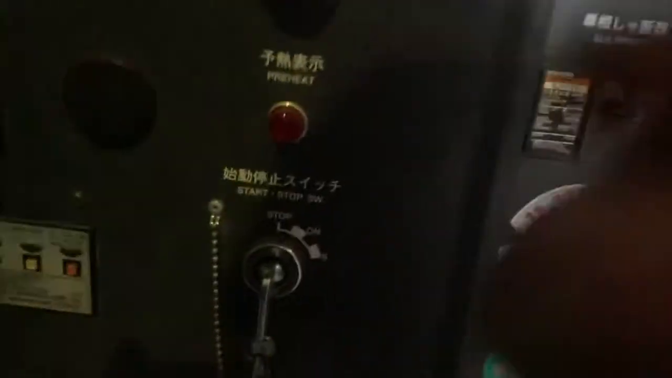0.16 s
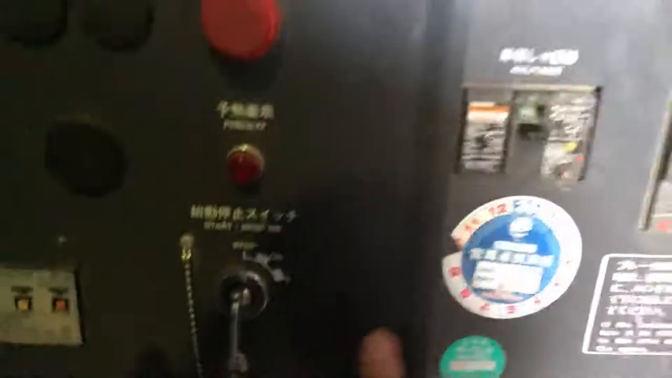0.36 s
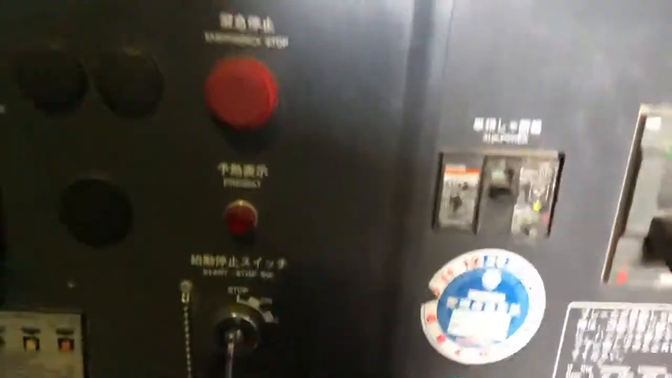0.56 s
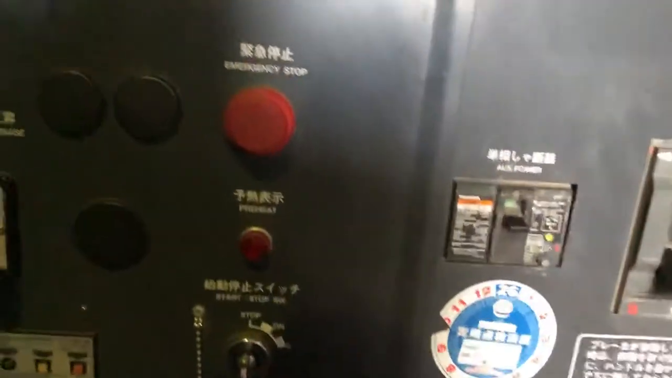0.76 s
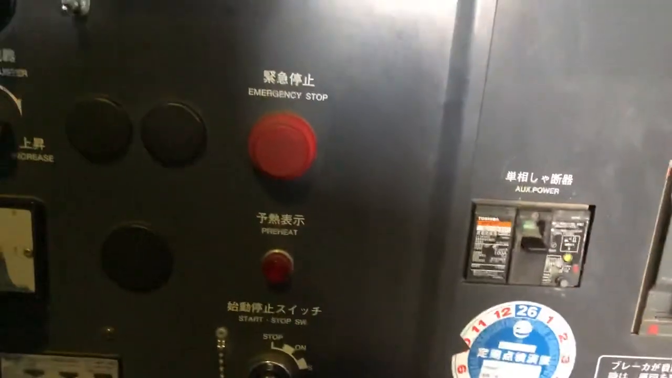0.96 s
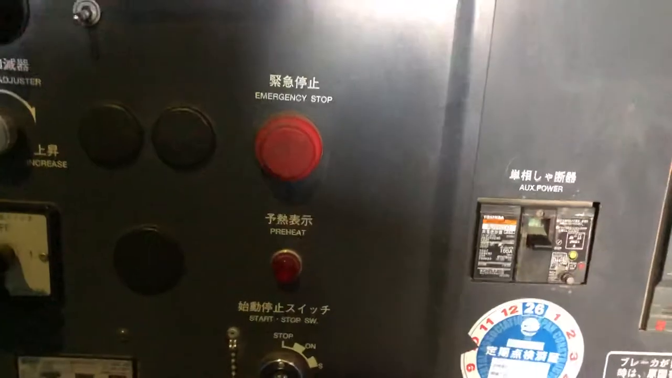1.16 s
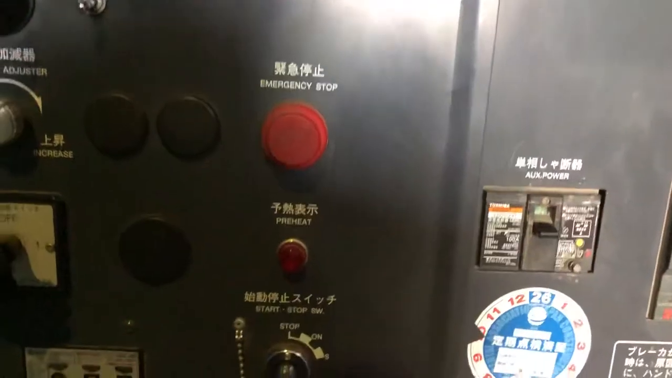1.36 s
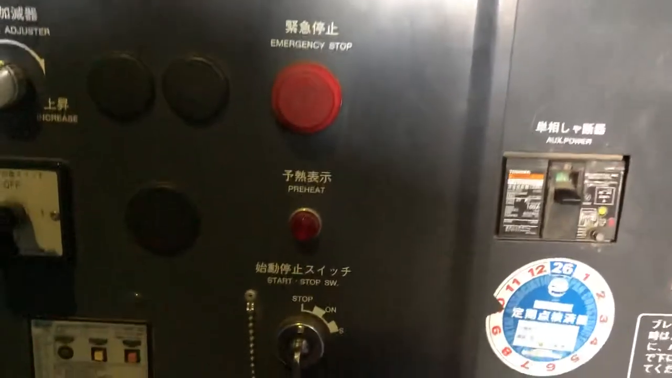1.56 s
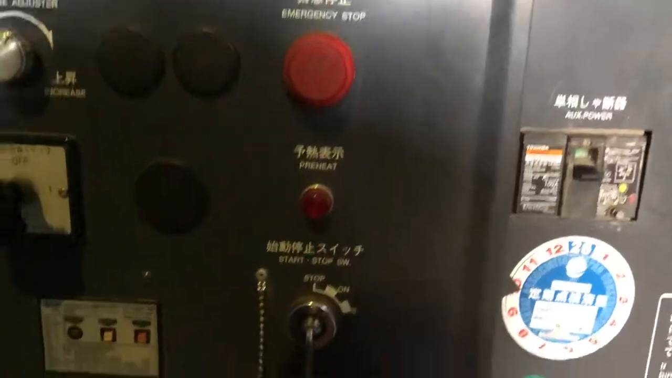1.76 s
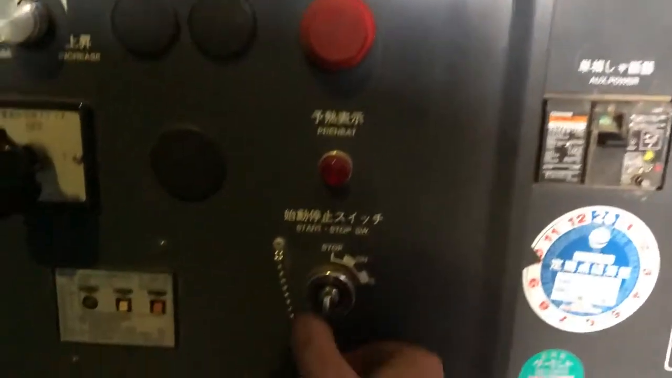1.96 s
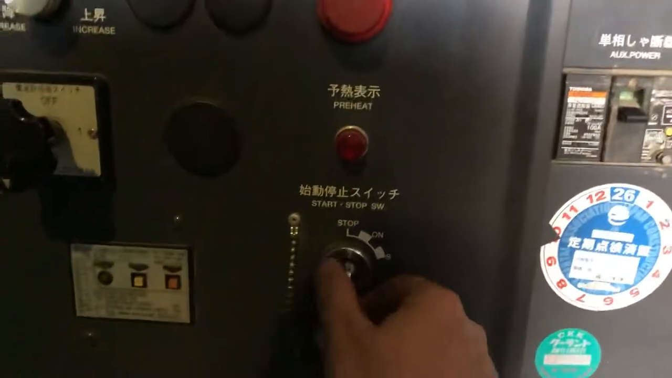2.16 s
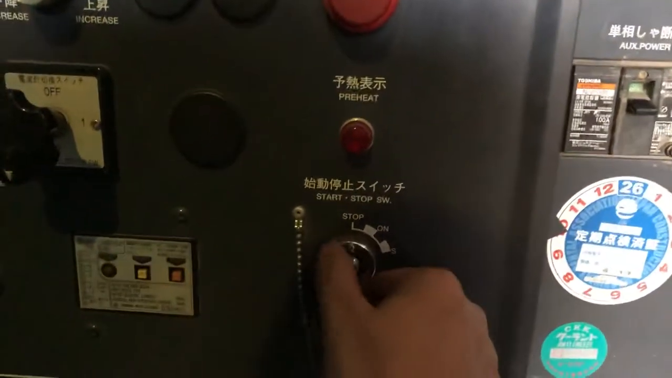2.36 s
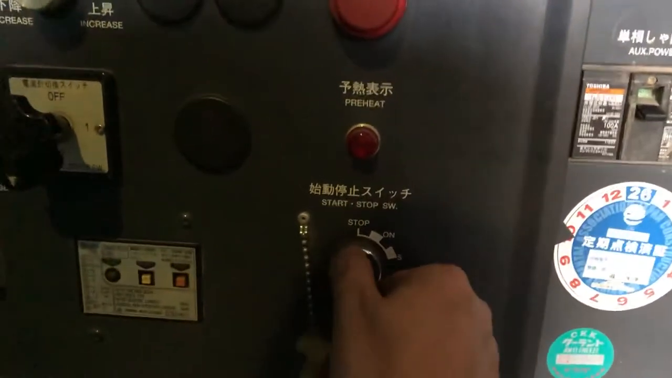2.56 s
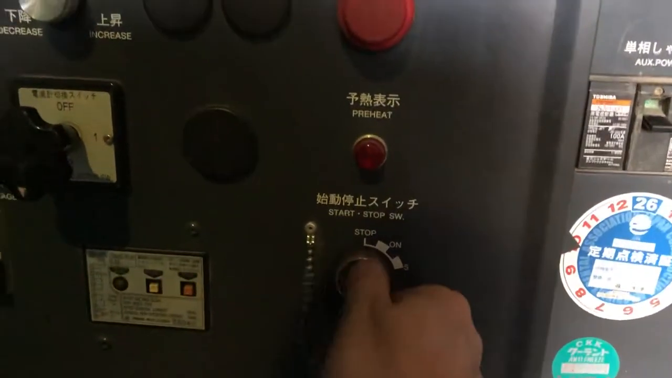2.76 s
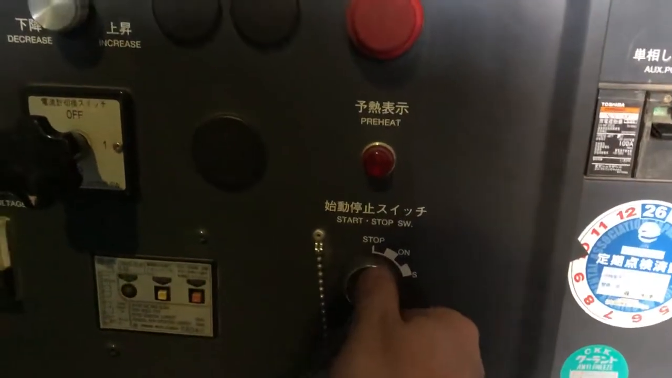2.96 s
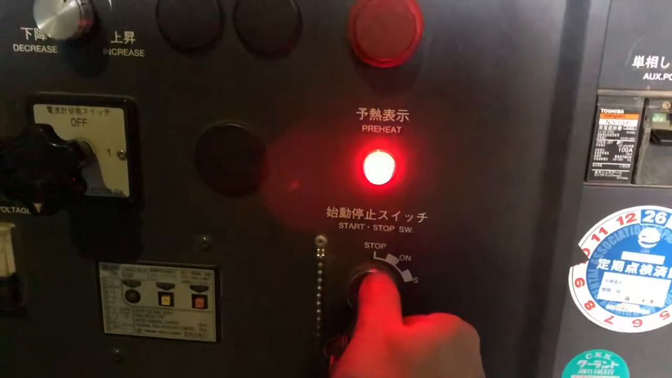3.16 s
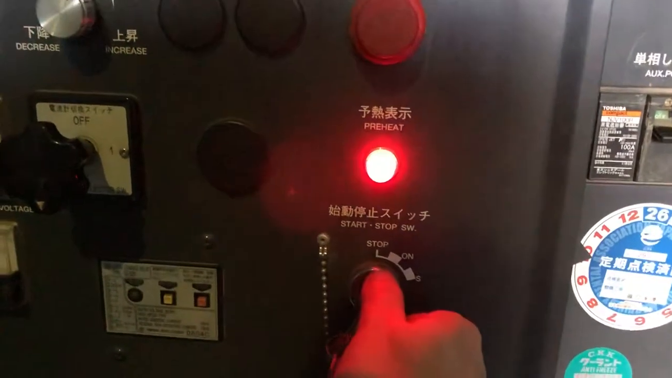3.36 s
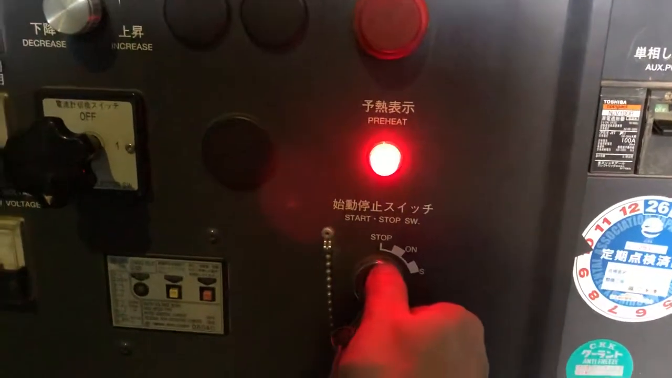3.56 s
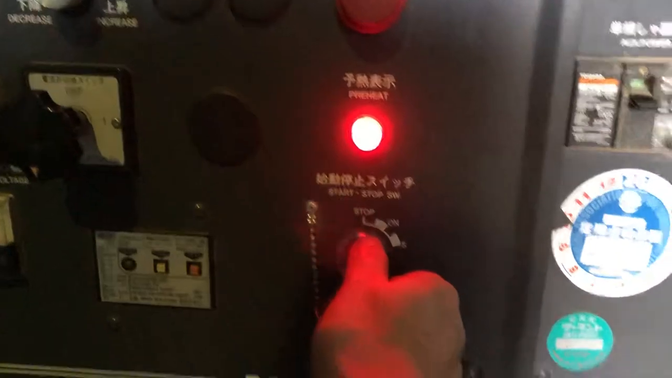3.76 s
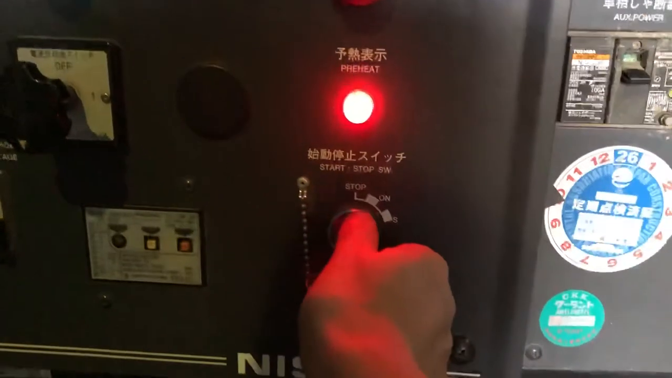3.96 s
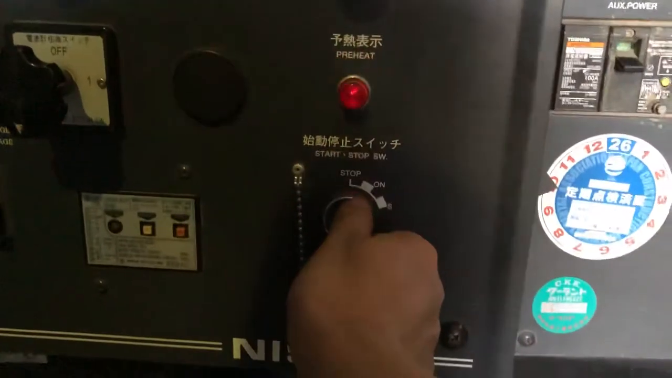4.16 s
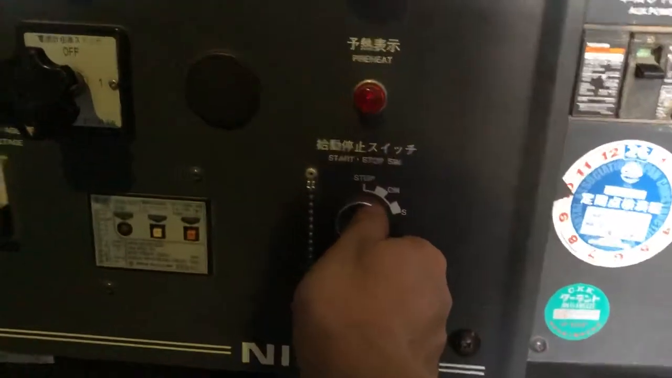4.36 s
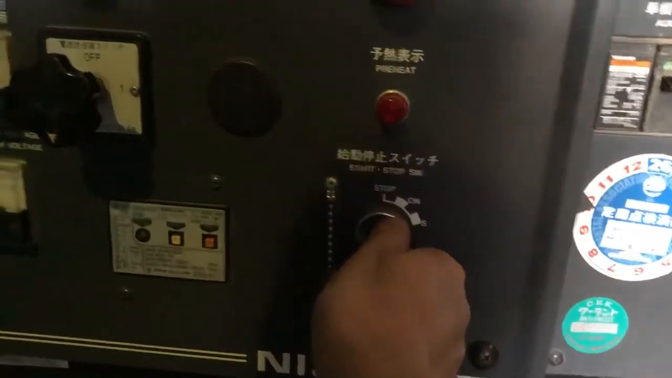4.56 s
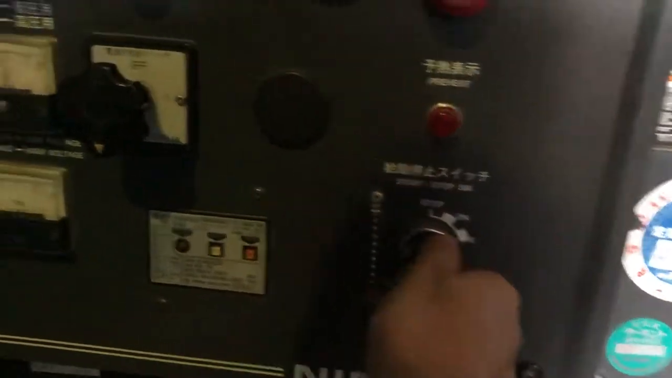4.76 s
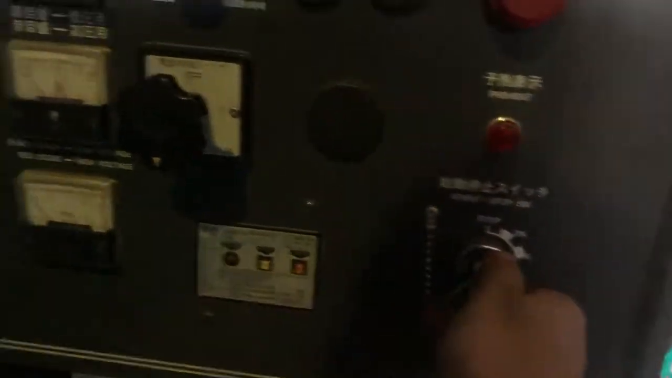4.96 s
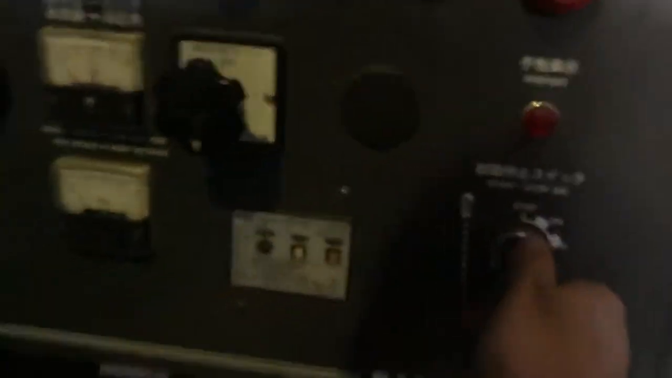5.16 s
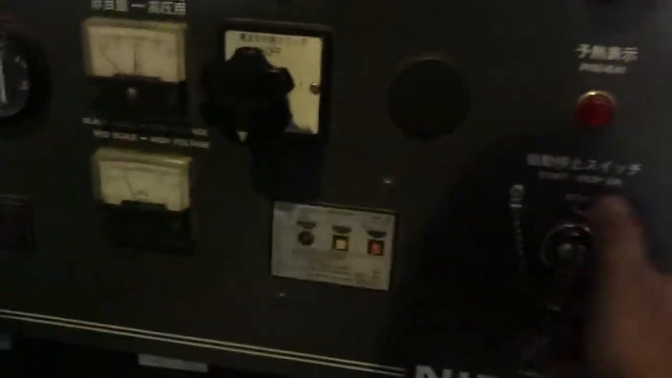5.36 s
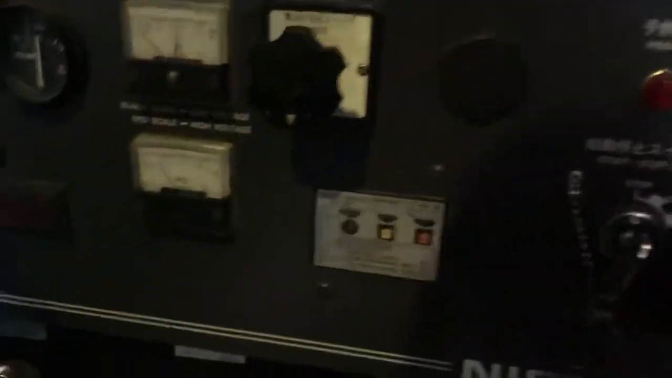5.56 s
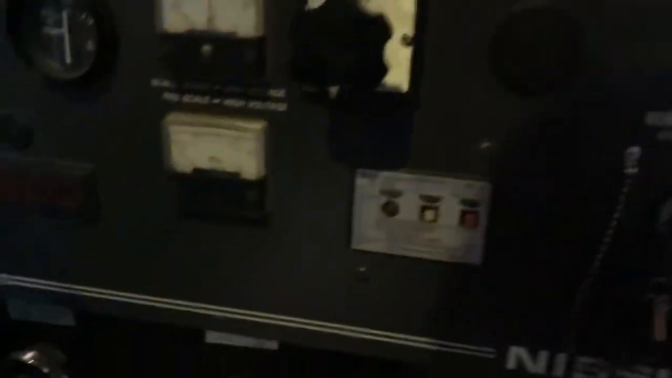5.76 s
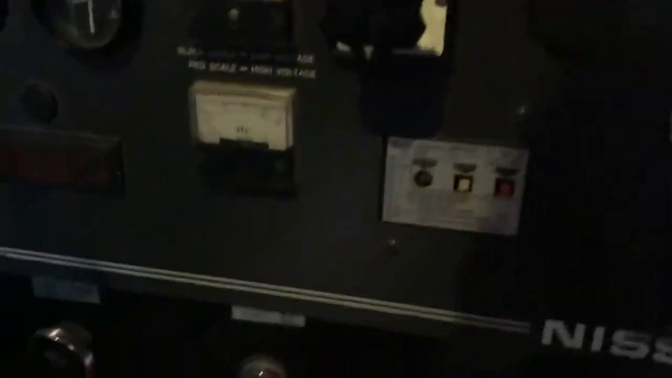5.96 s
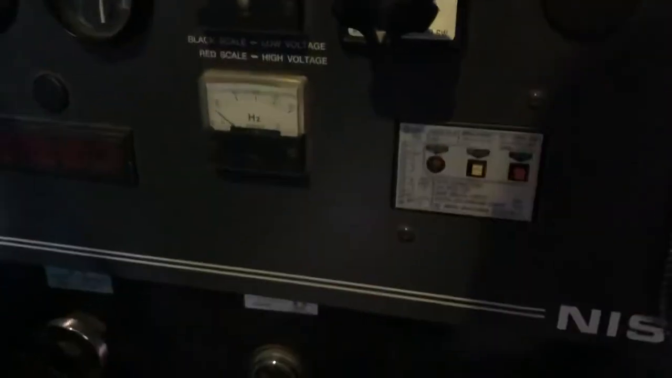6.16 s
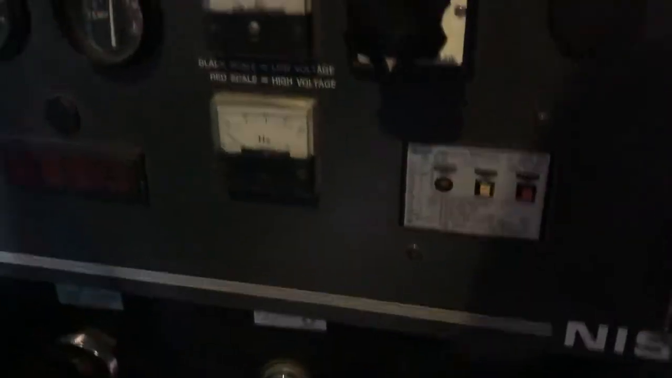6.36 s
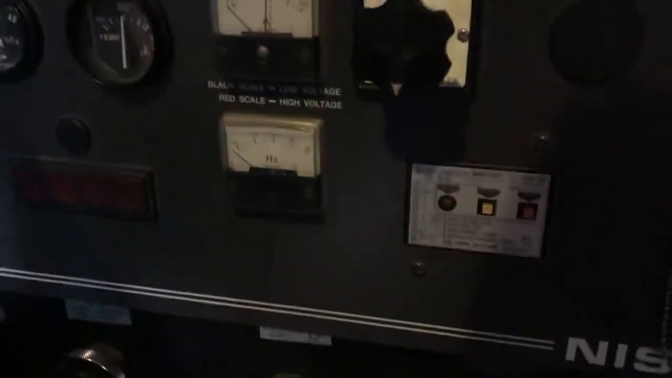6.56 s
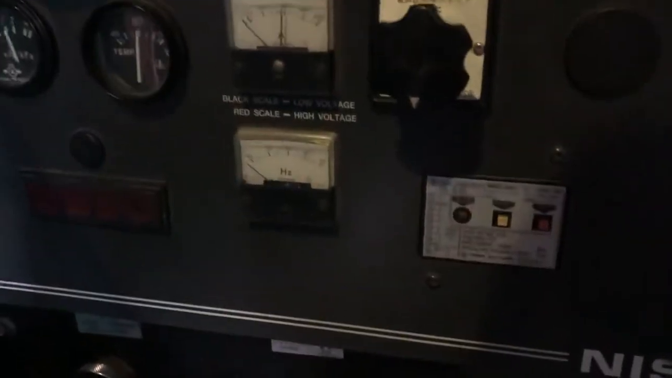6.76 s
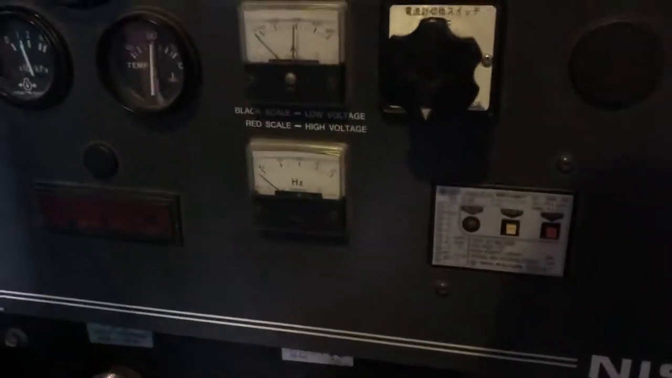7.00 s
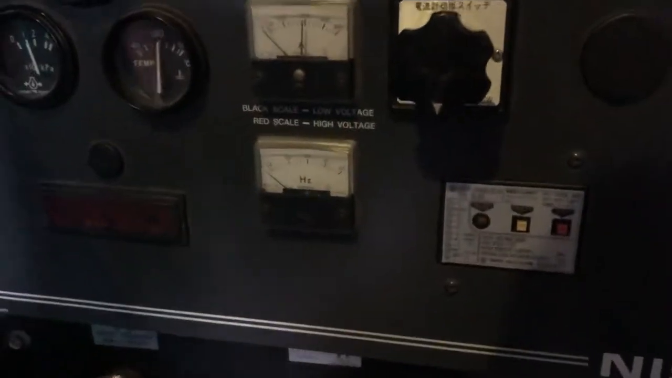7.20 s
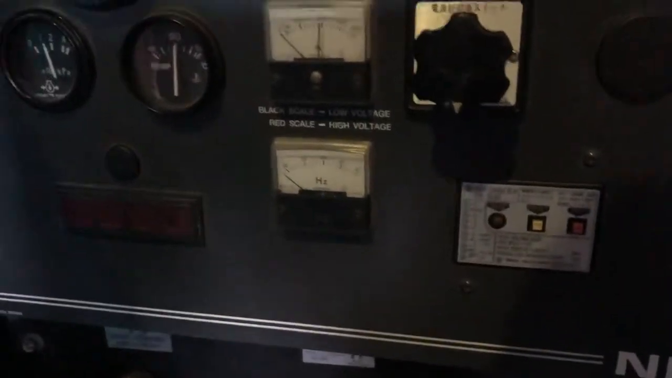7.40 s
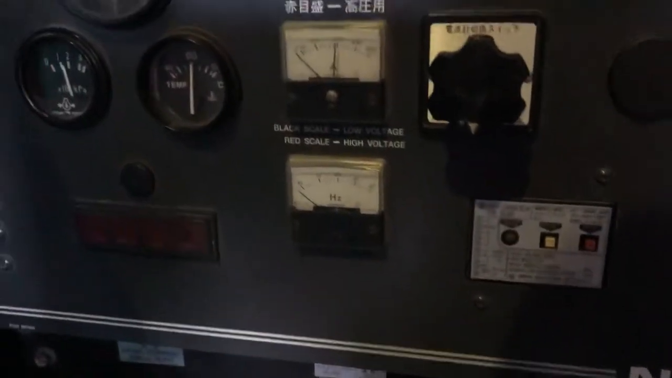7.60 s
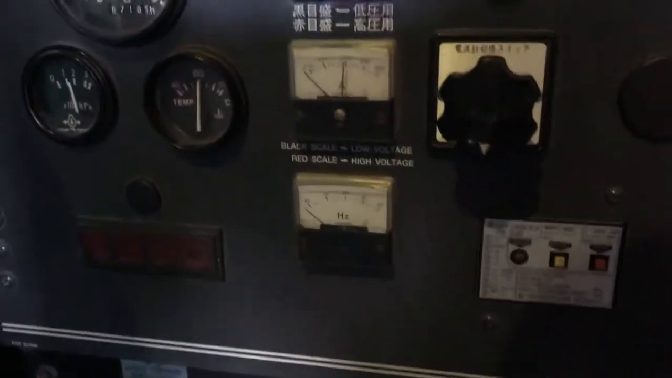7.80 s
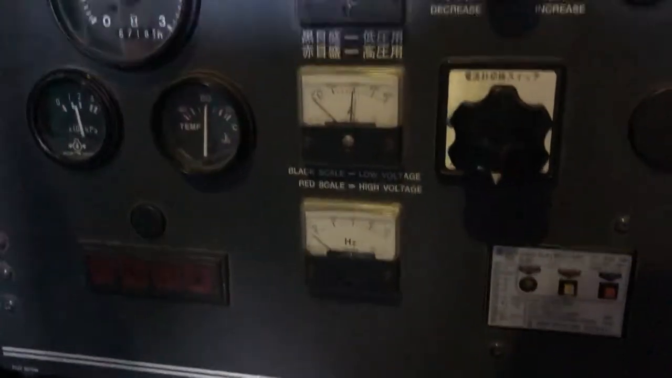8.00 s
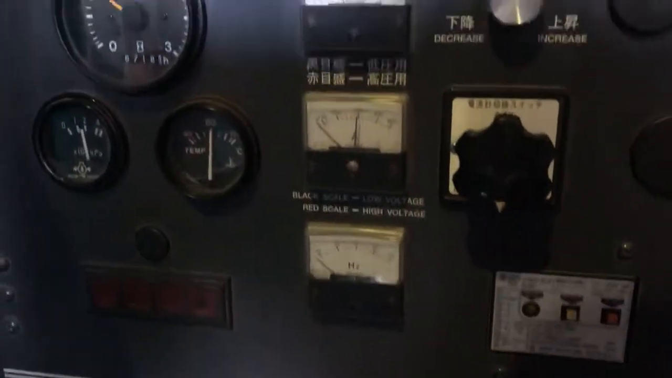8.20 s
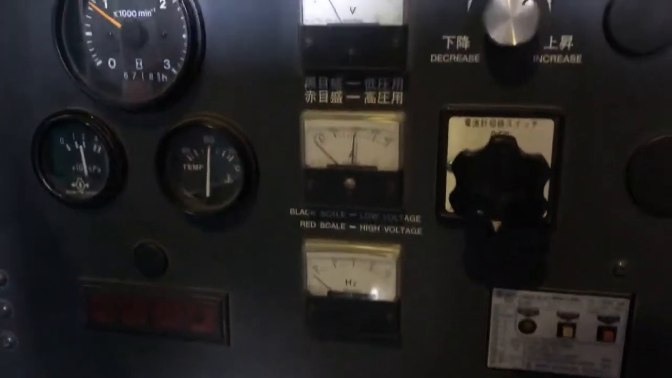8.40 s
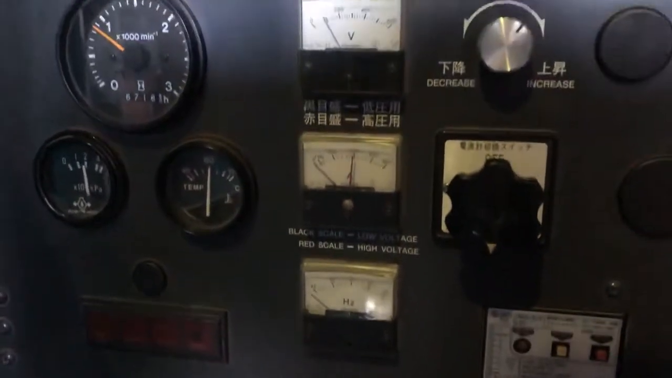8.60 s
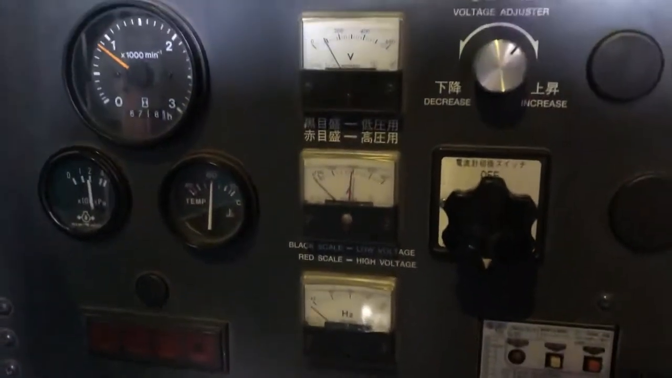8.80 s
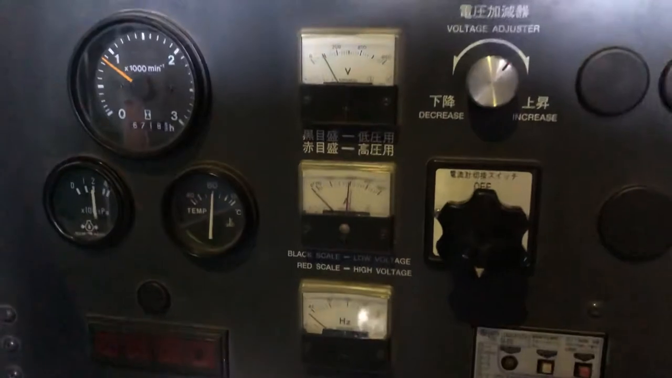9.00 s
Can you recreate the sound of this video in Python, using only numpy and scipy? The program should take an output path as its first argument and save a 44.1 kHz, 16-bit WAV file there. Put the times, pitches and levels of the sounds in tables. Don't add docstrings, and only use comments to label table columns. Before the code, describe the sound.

Quiet indoor hall with a low machinery hum. Small keys tick and jingle on a chain, then a sharp switch snap and relay clacks close by. After a pause, a solenoid clunks, the starter grinds and whines, and a diesel generator heaves, catches, surges briefly and settles to a steady knocking idle with panel drumming and loose metal chatter. Microphone at arm's length, loudest peaks slightly rounded.

```python
import sys
import numpy as np
from scipy import signal
from scipy.fft import rfft, irfft, next_fast_len
from scipy.io import wavfile
from scipy.ndimage import uniform_filter1d

SR = 44100
rng = np.random.default_rng(int(sys.argv[2]) if len(sys.argv) > 2 else 0)


def amplitude_ratio(level_db):
    exponent = np.asarray(level_db, float) / 20
    return 10 ** exponent


def unload_audio(sound):
    columns = np.transpose(np.atleast_2d(sound))
    steps = np.round(np.clip(columns, -1, 1) * 32767)
    wavfile.write(sys.argv[1], SR, steps.astype(np.int16))


N = 398663
T = np.arange(N) / SR

# frequency in Hz, density in dB per Hz.
HALL_SPECTRUM = [(18, -51), (30, -25), (48, -4), (96, -4), (254, -8.5), (322, -11.5), (419, -12),
                 (478, -7.5), (517, -15.5), (899, -16.5), (999, -21), (1610, -18), (2260, -23.5),
                 (7410, -37), (16300, -77)]
# frequency in Hz, width in Hz, lift in dB.
HALL_PEAKS = [(1063, 83, 2), (1870, 38, -13), (2030, 40, -6)]
# frequency in Hz, level in dB.
HUM = [(99.5, -54.5), (447, -64), (472, -64), (597, -66)]

# start in seconds, peak in dB, centre in Hz.
KEYS = [(.0498, -45, 3450), (.0827, -46, 5000), (.1, -41.5, 3140), (.1396, -45, 3710), (.2069, -42, 3550),
        (.3212, -40, 4000), (.6449, -43, 3220), (.7632, -34, 8800), (.8031, -47, 3820), (.8669, -42, 3230),
        (.9792, -45, 3220), (1.2056, -30.5, 6500), (1.397, -46, 4340), (1.5914, -36, 3940),
        (1.609, -29, 3760), (1.6352, -38.5, 6960), (1.785, -36, 10400), (1.863, -29, 3950),
        (1.8941, -43, 7840), (1.9315, -43, 10400), (1.9706, -36, 5210), (2.0093, -37, 8500),
        (2.0334, -33, 13000), (2.1296, -36.5, 12800), (2.1565, -45, 6070), (2.2667, -45, 5260),
        (2.402, -35, 6500), (2.575, -45, 8460), (2.593, -49, 3275), (2.6484, -42, 10430)]
# frequency in Hz, level in dB against the tick.
CHAIN = [(6050, -22), (8450, -22), (10300, -20), (15450, -18)]
# start in seconds, peak in dB, frequency in Hz.
JINGLES = [(.45, -68, 8400), (1.784, -35, 10350), (1.784, -52, 15500), (1.79, -57, 13700),
           (1.894, -52, 7850), (1.894, -50, 10900), (1.931, -55, 10350), (1.971, -59, 10350),
           (2.009, -59, 8500), (2.034, -51, 12900), (2.16, -56, 10350), (2.19, -59, 8600),
           (2.267, -51, 10440), (2.575, -59, 8450), (2.648, -47, 10350), (2.648, -54, 7800),
           (2.805, -40, 15400), (2.835, -52, 15600), (2.2, -60, 14200), (2.3, -63, 10350),
           (3.28, -52, 10300)]
# start in seconds, peak in dB, frequency in Hz, T60 in seconds.
RINGS = [(2.762, -20, 4900, .03), (2.73, -44, 10300, .2), (2.719, -27, 15500, .08),
         (2.719, -22, 5970, 0.02), (2.76, -21, 9200, .035), (2.76, -24, 14300, .04),
         (2.766, -27, 11100, .035), (2.798, -26, 7600, .035), (2.83, -38, 1380, 0.1),
         (2.862, -42, 1440, .14), (2.824, -39, 3350, .12), (4.372, -28, 4620, .06), (4.378, -30, 2300, .05),
         (4.416, -15, 5900, .03), (2.98, -59, 10250, .1), (2.724, -34, 1500, 0.08),
         (2.772, -20, 4300, 0.046), (2.802, -26, 3280, .1), (2.804, -30, 3130, .1),
         (2.806, -18.5, 1390, 0.059), (4.39, -15, 5330, 0.04), (4.45, -11, 3350, 0.1),
         (4.419, -20, 2100, .07), (4.474, -13, 3330, 0.044), (4.812, -18, 1370, .1), (4.812, -9, 456, 0.2),
         (5.246, -19, 9880, .06), (4.6, -43, 10900, 0.28), (4.812, -19, 2800, .05),
         (4.445, -15, 3750, 0.11), (4.546, -14.5, 1520, 0.12), (4.645, -23, 1260, 0.23),
         (4.69, -14, 1520, .08), (4.81, -14, 1850, .08)]
# start in seconds, length in seconds, level in dB, frequency in Hz.
SLIDES = [(1.1, .18, -66, 4950), (1.4, .24, -66, 4680), (1.44, .17, -73, 8400), (1.5, .36, -61, 2040),
          (1.79, .04, -62, 6050), (2.18, .14, -74, 5300), (2.22, .2, -67, 4700), (2.5, .2, -72, 5000),
          (2.5, .2, -66, 1530), (3.18, .2, -73, 4800)]
# start in seconds, peak in dB, centre in Hz.
SHAKEN_KEYS = [(4.925, -23, 10000), (5.07, -33, 14620), (5.12, -24, 12440), (5.16, -34, 15000),
               (5.648, -34, 15230), (5.73, -35, 14800), (5.795, -43, 14550), (6.345, -38, 11540)]

# start in seconds, peak in dB, centre in Hz, body in dB, body in Hz.
RELAYS = [(0.734, -38, 1500, -36, 480), (.752, -46, 1100, -42, 1100), (1.862, -31, 1200, -46, 450),
          (2.7595, -12.5, 5800, -36, 260), (2.7605, -20.5, 1500, -32, 500), (2.756, -33, 5500, -50, 400),
          (2.771, -18, 4500, -29, 200), (2.783, -26, 2200, -32, 300), (2.8, -25, 640, -31, 820),
          (2.798, -15.5, 4100, -22, 562), (2.808, -18.5, 1350, -16, 300), (2.815, -30, 6000, -30, 700),
          (2.808, -45, 900, -27, 110)]
LATCH = [
    (2.7185, -11, 6400, -43, 530),
    (2.7184, -8, 1250, -55, 530),
    (2.7186, -13, 5500, -55, 530),
]
SOLENOID = [
    (4.3706, -24, 8500, -44, 355),
    (4.371, -33, 3300, -45, 355),
    (4.8096, -13, 2600, -14, 461),
    (5.013, -11, 1500, -5.5, 304),
]
PINION = [(4.386, -20, 5200, -17, 290), (4.3909, -9, 2970, -18, 290), (4.442, -12, 5500, -19, 213),
          (4.448, -15, 9500, -30, 213), (4.4152, -9, 6000, -8, 216), (4.461, -28, 900, -16, 76),
          (4.481, -22, 3300, -25, 403), (4.434, -9, 2510, -11, 211), (4.4506, -9.5, 3330, -8.5, 420),
          (4.4744, -14, 2080, -9.5, 678), (4.8398, -19, 2000, -4.5, 460)]
FIRINGS = [(4.897, -15, 1870, -10, 313), (4.9592, -20, 1890, -6, 305), (5.2133, -7, 4350, -19, 245),
           (5.18, -21, 3000, -10, 300), (5.247, -10.5, 4800, -6.5, 302), (4.39, -19, 1100, -26, 120),
           (5.058, -14, 2400, -13, 300), (5.1, -15, 1900, -14, 280), (5.136, -19, 1600, -14, 300),
           (5.3, -20, 1500, -14, 245), (5.335, -21, 3200, -14, 300), (5.401, -31, 3400, -8, 322),
           (5.36, -21, 1000, -5.5, 343), (5.722, -21, 1800, -17, 307)]
BLOW_T60_S = [0.021, 0.059, 0.09, 0.053, 0.075]
# start in seconds, peak in dB,
# frequency in Hz, T60 in seconds.
HEAVES = [(4.66, -22, 45, 0.22), (4.78, -20, 78, .3), (4.8, -20, 42, .3), (4.89, -17, 44, 0.26),
          (4.96, -19, 42.2, .25), (5.04, -13.5, 48, .3), (0.739, -39, 180, 0.11), (4.15, -40, 100, .6)]

# time in seconds, engine cycles in Hz.
CRANKING = [
    (4.36, 1.0),
    (4.8, 2.9),
    (4.95, 5.6),
    (5.03, 5.2),
]
# time in seconds, pitch in Hz.
SPEED = [
    (5.08, 211),
    (5.16, 194.4),
    (5.27, 199.4),
    (5.4, 240.3),
    (5.64, 229.4),
    (5.93, 233.2),
    (9.04, 233.2),
]
# time in seconds, load in dB, harshness of metal contact in dB.
ENGINE = [(4.4, -19.5, -7), (4.456, -16, 7), (4.5, -19.5, -1.5), (4.582, -22, 4.5), (4.686, -19, 4.5),
          (4.76, -22.5, 6.5), (4.8, -31, 11), (4.81, -18.5, 11.5), (4.854, -20.5, 2.5), (4.88, -22, 5.5),
          (5.168, -15.5, 3.5), (5.248, -20.5, 10), (5.292, -20, -1), (5.37, -19, -3.5), (5.43, -23.5, 1),
          (5.56, -25, 2), (5.72, -22.5, -0.5), (9.04, -22.5, -1)]
# multiple of the firing rate, level in dB.
FIRING_ORDERS = [(1, -39), (2, -5), (3, -40), (4, 3), (4.96, 0), (6, -10), (7, -30), (8, -11), (9, -20.5),
                 (10, -21), (11, -28.5), (12, -11), (13, -17), (14, -4), (15, -16), (16, -13)]
# time in seconds, lift in dB of the 2nd order, of the 4th, of the 5th.
ROCKING = [(4.95, 8, -10, -5), (5.15, 15, -7, 0), (5.3, 4, -9, 3), (5.42, 11, -3, 3), (5.52, 0, 3, 5),
           (5.64, -10, -3, 2.5), (5.75, 2, -3, -0.5)]
# dB in the housing, dB in the clatter, dB in the injector ring.
KNOCKS = [(-2, -1, 0), (-3, -7, -20), (0, -2, -11), (-7, -8, -20), (-1, -3, -10), (-4, -7, -18)]
# frequency in Hz, density in dB per Hz.
HOUSING = [(18, -41), (30, -9.5), (96, 0.5), (180, -3.5), (234, -3), (282, -5.5), (638, -22.5),
           (923, -23.5), (1050, -15), (1170, -21.5), (1930, -22.5), (2510, -26.5), (3730, -30),
           (15100, -55.5), (16300, -73)]
# frequency in Hz, width in Hz, lift in dB.
PANELS = [(469, 1.9, 21), (570, 7.8, 4), (816, 81, 3), (1084, 12, -22), (1280, 25, 4.5), (1395, 63, -20),
          (1530, 35, -12), (1717, 12, 5), (1884, 60, 4.5), (2013, 54, -0.5), (2764, 55, -1),
          (3880, 270, -16), (4300, 4.2, -23)]
# frequency in Hz, density in dB per Hz.
GRIND = [(180, 10), (300, 8), (386, -3.5), (626, -7.5), (716, -7), (1520, -9.5), (2820, -5.5),
         (4300, -14.5), (8090, -29), (16300, -61)]
# frequency in Hz, width in Hz, lift in dB.
GRIND_PEAKS = [(1280, 36, -10), (1520, 76, 2), (1877, 59, 2), (2127, 27, 2), (2480, 42, -4), (2870, 55, 2),
               (3300, 80, -5)]
# time in seconds, level in dB.
FUEL_PIPE = [(5.95, -45), (6.2, -29), (7.9, -27.5), (8.0, -32), (9.04, -34)]
# frequency in Hz, density in dB per Hz.
HISS = [(2940, -6), (5000, -8.5), (9900, -8), (12300, -16.5), (15200, -16), (16100, -16), (16300, -32)]
# frequency in Hz, width in Hz, lift in dB.
HISS_PEAKS = [(6700, 320, 10), (7200, 90, 8), (7900, 200, 9), (8200, 80, 8), (8750, 70, 12), (9800, 60, 10),
              (11000, 160, 2), (15500, 200, 8)]

# time in seconds, pitch in Hz, level in dB, octave in dB.
MESH = [(4.47, 183.5, -25, -65), (4.538, 200.4, -35, -17.5), (4.6, 262.5, -21, -27), (4.62, 285, -19, -35),
        (4.65, 319.4, -14, -33), (4.662, 327.5, -11.5, -28), (4.71, 299.5, -14, -26),
        (4.734, 267.8, -21, -27), (4.796, 270.4, -20.5, -60), (4.818, 249, -35, -12), (4.87, 237, -45, -30)]
# multiple of its pitch, level in dB against the grind.
MESH_UPPER = [(3, -17), (4, -13), (5, -13), (6, -17), (7, -13), (9, -8), (12, -15)]
# time in seconds, pitch in Hz, level in dB.
WHINE = [(4.72, 2350, -40), (4.742, 2650, -24), (4.756, 3300, -24), (4.77, 3850, -25), (4.79, 4350, -32),
         (4.815, 4850, -33), (4.845, 5450, -37), (4.87, 5800, -50)]
WHINE_AGAIN = [(4.82, 4200, -45), (4.86, 4750, -32), (4.9, 5300, -34), (4.93, 5700, -32), (4.97, 6100, -48)]
# time in seconds, level in dB.
OVERRUN = [(4.9, -35), (5.02, -24.5), (5.12, -23), (5.22, -17.5), (5.27, -27), (5.3, -36), (5.42, -50)]
# time in seconds, level in dB.
CHATTER = [(5.25, -22), (5.45, -36), (5.6, -33.5), (5.72, -29.5), (5.9, -31.5), (6.15, -34), (6.4, -42.5),
           (7.4, -36), (9.04, -41)]
# frequency in Hz, half width in Hz, level in dB.
COVER = [(2480, 50, -8), (2570, 81, 6.5), (2680, 43, -5), (2794, 45, 3.5), (2820, 37, -7), (2960, 56, 2),
         (3290, 60, -3)]


def level(x, db):
    return x * amplitude_ratio(db) / np.sqrt(np.mean(x ** 2))


def curves(table):
    s, *columns = np.transpose(table)
    return [np.interp(T, s, c) for c in columns]


def colour(x, points, peaks=(), peak_db=0.):
    size = next_fast_len(len(x))
    hz = np.arange(size // 2 + 1) * SR / size + 1
    point_hz, point_db = np.transpose(points)
    db = np.interp(np.log(hz), np.log(point_hz), point_db)
    lift = 1 + sum(amplitude_ratio(peak_db + .5 * d) / (1 + (2 * (hz - f) / w) ** 2) for f, w, d in peaks)
    return irfft(rfft(x, size) * amplitude_ratio(db) * lift, size)[:len(x)]


def band(x, lo_hz, hi_hz, order=3):
    sos = signal.butter(order, [lo_hz, min(hi_hz, .45 * SR)], "bandpass", fs=SR, output="sos")
    return signal.sosfilt(sos, x)


def walk(rate):
    k = int(SR / rate)
    steps = np.repeat(rng.standard_normal(N // k + 1), k)
    return 1.4 * uniform_filter1d(uniform_filter1d(steps, k), k)[:N]


def tone(hz, db, wobble_db, rate):
    return np.sqrt(2) * amplitude_ratio(db + wobble_db * walk(rate)) * np.sin(2 * np.pi * np.cumsum(hz) / SR)


def hump(s, width_s):
    return np.exp(-((T - s) / width_s) ** 2)


def add(out, s, burst):
    i = int(s * SR)
    out[i:i + len(burst)] += burst[:N - i]


def fade(t60, size=12000, rise=.0003):
    t = np.arange(size) / SR
    return (1 - np.exp(-t / rise)) * 1000. ** (-t / max(t60, .003))


def crack(peak_db, hz, t60, spread, order=2):
    spread = max(spread, 1.005)
    burst = band(rng.standard_normal(12000), hz / spread, hz * spread, order=order)
    return level(burst, peak_db - 2.0) * fade(t60, rise=0.00087)


def ring(hz, t60, rise=0.00062, droop=0.):
    t = np.arange(12000) / SR
    pitch = hz * (1 - droop * np.minimum(t / t60, 1))
    return np.sin(2 * np.pi * np.cumsum(pitch) / SR) * fade(t60, rise=rise)


def hall():
    wash = colour(rng.standard_normal(N), HALL_SPECTRUM, HALL_PEAKS, peak_db=3.5)
    octaves = 40 * 2 ** np.arange(3)
    wash = wash + sum(.12 * walk(9) * band(wash, lo, 2 * lo, order=1) for lo in octaves)
    wash = level(wash, 0) * amplitude_ratio(-44 - 0.3 * walk(0.63) - 1.36)
    hum = sum(tone(np.full(N, 1. * f), db, 2.5, 7) for f, db in HUM)
    mic_hiss = level(band(rng.standard_normal(N), 100, 9000, order=1), -67.5)
    return wash + hum + mic_hiss


def keys():
    out = np.zeros(N)
    for s, db, hz in KEYS:
        spread = 1.3 * (hz / 3300) ** 0.9
        add(out, s, crack(db, hz, 0.041, spread))
        if hz > 5100 and s > 1.7:
            add(out, s + .021, crack(db - 10, hz, 0.0098, spread))
            for link_hz, link_db in CHAIN:
                chance_db = 5 * rng.standard_normal() - 2
                add(out, s, crack(db + link_db + chance_db, link_hz, .11, 1.01))
    for s, db, hz in SHAKEN_KEYS:
        add(out, s, crack(db, hz, .06, 1.03 if s > 5.3 else 1.5, order=1))
    return out


def ringing_metal():
    out = np.zeros(N)
    jingles = [(s, db, hz, 0.11 * (1e4 / hz) ** 2.6) for s, db, hz in JINGLES]
    for s, db, hz, t60 in jingles + RINGS:
        pair = ring(hz, t60) + .4 * ring(1.008 * hz, t60)
        add(out, s, amplitude_ratio(db) * (pair + .55 * crack(0, hz, t60, 1.03)))
    return out


def blows():
    out = np.zeros(N)
    for kind, t60 in zip([LATCH, RELAYS, SOLENOID, PINION, FIRINGS], BLOW_T60_S):
        order = 4 if kind is LATCH else 2
        for s, db, hz, body_db, body_hz in kind:
            droop = .25 * (s > FIRINGS[0][0] - .01)
            boom = ring(body_hz, 1.6 * t60, rise=.004, droop=droop)
            boom = boom + .2 * crack(6, body_hz, 1.4 * t60, spread=1.6)
            add(out, s, crack(db, hz, t60, spread=2.02, order=order) + amplitude_ratio(body_db) * boom)
    return out


def heaves():
    out = np.zeros(N)
    for s, db, hz, t60 in HEAVES:
        add(out, s, amplitude_ratio(db) * ring(hz, t60, rise=0.013))
    return out


def slides():
    out = 0
    for s, length, db, hz in SLIDES:
        on = np.interp(T, [s - .02, s + .02, s + .7 * length, s + length], [0, 1, .8, 0])
        out = out + on * tone(hz * (1 + .008 * walk(150)), db - 1, 4, 60)
    return out


def spring():
    on = np.interp(T, (2.722, 2.73, 2.758, 2.763), [0, 1, 1, 0])
    return on * tone(np.full(N, 8450.), -36, 1, 60)


def crank_angle():
    drum_order, strong_knock_s = 32, 8.010
    rate = curves(CRANKING + [(s, hz / drum_order) for s, hz in SPEED])[0]
    cycle = np.cumsum(rate) / SR
    return cycle - cycle[int(strong_knock_s * SR)]


def repeating(cycle, likeness):
    samples = 6048
    likeness = np.clip(likeness, 0, .99)
    rows = signal.lfilter([1], [1, -likeness], rng.standard_normal((80, samples)), axis=0)[30:]
    turns = cycle - np.floor(cycle[0])
    return level(rows[turns.astype(int), (turns % 1 * samples).astype(int)], 0)


def knocking(cycle, caught):
    slot, after = np.floor(6 * cycle).astype(int), 6 * cycle % 1
    stroke = amplitude_ratio(rng.standard_normal(400))[slot - slot[0]] * caught
    stroke = stroke * (1 - np.exp(-after / .13)) * np.exp(-after / .75)
    return [amplitude_ratio(np.array(column))[slot % 6] * stroke for column in zip(*KNOCKS)]


def thump(turn, caught, fresh, same):
    db = np.interp(T, (5.17, 4.86), [-27, -16])
    db = db + 6 * hump(5.4, .09)
    db = db - 2 * hump(5.52, 0.13)
    rock = dict(zip([2, 4, 4.96], curves(ROCKING)))
    orders = 0
    for k, order_db in FIRING_ORDERS:
        strength = amplitude_ratio(order_db + rock.get(k, 0) + 2.2 * walk(6))
        orders = orders - strength * np.cos(3 * k * turn + .35 * rng.standard_normal())
    low = level(band(colour(0.68 * fresh + 0.49 * caught * same, HOUSING), 21.4, 435, order=4), 0)
    low = low + amplitude_ratio(4.0) * caught * level(orders, 0)
    return amplitude_ratio(db - 4.0) * np.interp(T, [4.4, 4.5], [.1, 1]) * low


def drumming(turn):
    strength = np.sqrt(2) * amplitude_ratio(-16 + 0.5 * walk(15))
    return -strength * np.cos(32 * turn) * np.interp(T, [5.08, 5.36], [0, 1])


def roar_and_clatter(roar_db, clatter_db, knock, caught, fresh, same):
    roar = (.7 * rng.standard_normal(N) + .7 * caught * same) * (1 + 2.8 * knock[0])
    clatter = (rng.standard_normal(N) + .4 * caught * same) * (1 + 2.6 * knock[1])
    grind = colour(fresh, GRIND, GRIND_PEAKS, peak_db=3)
    grinding = np.interp(T, [4.78, 5.0], [1, 0])
    out = 0
    for x, lo, hi, db in [(roar, 380, 2300, roar_db + 0.5), (clatter, 2300, 17000, clatter_db - .1)]:
        running = level(band(colour(x, HOUSING, PANELS, peak_db=-0.5), lo, hi), 0)
        starting = level(band(grind, lo, hi), 0)
        out = out + amplitude_ratio(db) * (np.sqrt(grinding) * starting + np.sqrt(1 - grinding) * running)
    return out


def fuel_pipe(cycle):
    pipe_hz, pipe_t60 = 3700, .1
    out = np.zeros(N)
    db, chance = curves(FUEL_PIPE)[0], rng.standard_normal((80, 2))
    for i, (a, b) in zip(np.flatnonzero(np.diff(np.floor(cycle)) > 0), chance):
        hz = pipe_hz * (1 + .008 * a)
        pipe = .9 * ring(hz, pipe_t60, rise=.003) + crack(-1, hz, .09, 1.12) + .4 * ring(.88 * hz, .06)
        add(out, i / SR + .002, amplitude_ratio(db[i] + 7 + .7 * b) * pipe)
        tappet = crack(-20 + 2 * a, 2040, .06, 1.15)
        add(out, i / SR + .046, tappet * (i > 5.6 * SR))
    return out


def hissing(knock):
    air = colour(rng.standard_normal(N), HISS, HISS_PEAKS, peak_db=-4.5) * (1 + .5 * knock)
    lows = 4000 * 1.25 ** np.arange(6)
    swells = sum(.2 * walk(5) * band(air, lo, 1.25 * lo, order=2) for lo in lows)
    return level(air + swells, 0)


def engine():
    cycle = crank_angle()
    turn = 2 * np.pi * (cycle + .073)
    caught = np.interp(T, [4.95, 5.3], [0, 1])
    roar_db, harsh_db = curves(ENGINE)
    clatter_db = roar_db - 7.5 + harsh_db
    hiss_db = roar_db - 9 + 0.89 * harsh_db - 4 * (1 - caught)
    hiss_db = hiss_db + np.clip(-7 * (T - 6.33), -13, 0)
    knock = knocking(cycle, caught)
    fresh, same = rng.standard_normal(N), repeating(cycle, 0.89)
    low = thump(turn, caught, fresh, same)
    upper = roar_and_clatter(roar_db, clatter_db, knock, caught, fresh, same)
    injector = level(band(1.5 * same + fresh, 3550, 3950, order=1), 0)
    injector = amplitude_ratio(clatter_db - 2) * knock[2] * injector + fuel_pipe(cycle)
    hiss = amplitude_ratio(hiss_db - 2.5) * hissing(knock[1])
    on = np.interp(T, [4.385, 4.39, 4.414, 4.42], [0, .5, .5, 1])
    body = on * (low + upper + injector + hiss)
    return body + drumming(turn) + chatter(knock[0]) + snaps(cycle, roar_db)


def starter():
    hz, db, octave_db = curves(MESH)
    first, last = MESH[0][0], MESH[-1][0]
    on = np.interp(T, [first - .02, first, last, last + 0.025], [0, 1, 1, 0])
    teeth = tone(hz * (1 + .012 * walk(90)), db, 2.5, 50)
    teeth = teeth + tone(2 * hz * (1 + .012 * walk(90)), octave_db - 1, 2.5, 50)
    grind_db = curves(ENGINE)[0]
    for k, d in MESH_UPPER:
        partial_db = grind_db + d + (hz - 300) / 20
        teeth = teeth + tone(k * hz * (1 + .009 * walk(300)), partial_db, 4, 40)
    out = on * teeth
    for sweep in (WHINE, WHINE_AGAIN):
        hz, db = curves(sweep)
        sounding = (T > sweep[0][0]) * (T < sweep[-1][0])
        out = out + sounding * tone(hz * (1 + .01 * walk(400)), db - 2.5, 2, 150)
    return out


def overrun():
    noise = rng.standard_normal(N)
    rasp = amplitude_ratio(curves(OVERRUN)[0]) * level(band(noise, 2600, 5600, order=2), 0)
    sing = amplitude_ratio(-29) * hump(5.11, .1) * level(band(noise, 4500, 4600, order=1), 0)
    return (rasp + sing) * (T > OVERRUN[0][0]) * (T < OVERRUN[-1][0])


def chatter(knock):
    shaken = rng.standard_normal(N) * (0.5 + 1.6 * knock)
    modes = 0
    for hz, w, db in COVER:
        modes = modes + amplitude_ratio(db + 5.5 * walk(18)) * level(band(shaken, hz - w, hz + w, order=1), 0)
    return level(modes, 0) * amplitude_ratio(curves(CHATTER)[0]) * np.interp(T, [5.05, 5.2], [0, 1])


def snaps(cycle, load_db):
    kicks, at = np.zeros(N), np.flatnonzero(np.diff(np.floor(6 * cycle)) > 0)
    at = at[(at > 5.05 * SR) & (at < N - 600)]
    chance = rng.standard_normal((400, 2))[:len(at)]
    lag_s = .004 + .0015 * chance[:, 1]
    kicks[at + (lag_s * SR).astype(int)] = -amplitude_ratio(load_db[at] + 9 + 4 * chance[:, 0])
    return 5 * band(kicks, 350, 2000, order=2)


def scene():
    hits = keys() + ringing_metal() + blows() + heaves() + spring()
    tail = band(rng.standard_normal(12000), 170, 5000, order=1)
    tail = tail * (fade(0.17, rise=0.0028) + 0.14 * fade(1.0, rise=.01))
    wet = signal.fftconvolve(hits, amplitude_ratio(-16.5) * tail / np.sqrt(np.sum(tail ** 2)))[:N]
    return (hall() + hits + wet + slides() + engine() + starter() + overrun())[None]


def roll_off(x):
    return signal.sosfilt(signal.butter(12, 16480, fs=SR, output="sos"), x)


def record(dry):
    dry = signal.sosfilt(signal.butter(4, 33, "highpass", fs=SR, output="sos"), dry)
    rounded = dry / (1 + np.abs(dry / .98) ** 6) ** (1 / 6)
    rounded = signal.sosfilt(signal.ellip(7, .5, 32, 15680, fs=SR, output="sos"), rounded)
    finished = .97 * rounded
    return roll_off(finished)


dry = scene()
out = record(dry)
unload_audio(out)
```